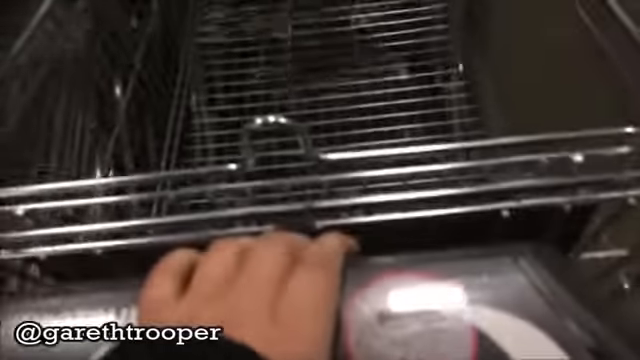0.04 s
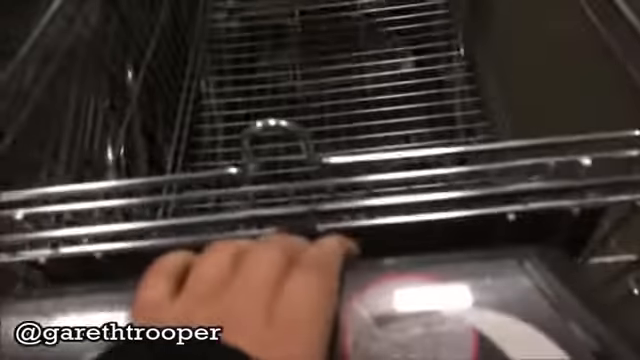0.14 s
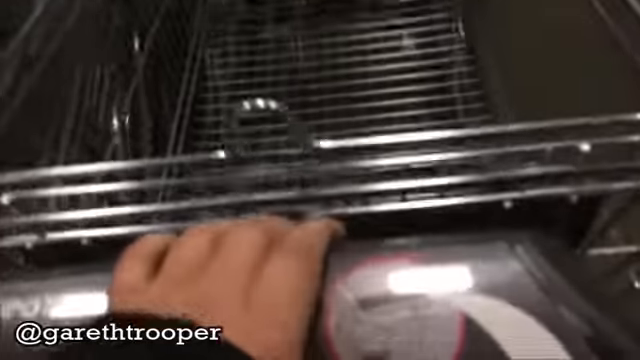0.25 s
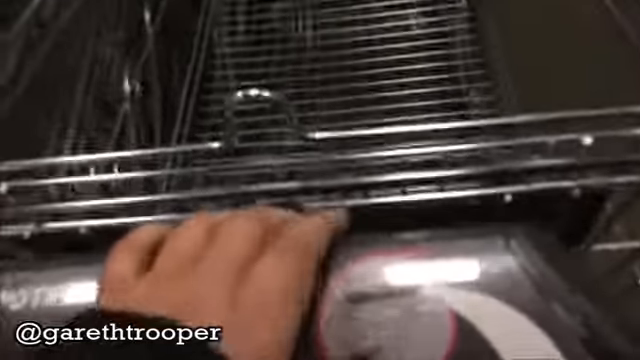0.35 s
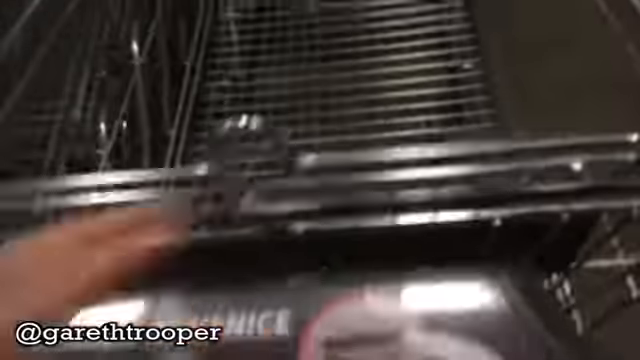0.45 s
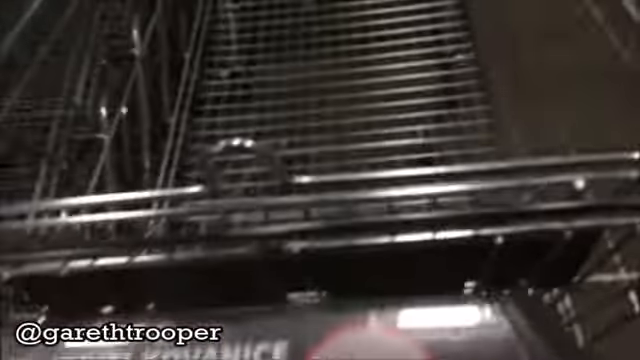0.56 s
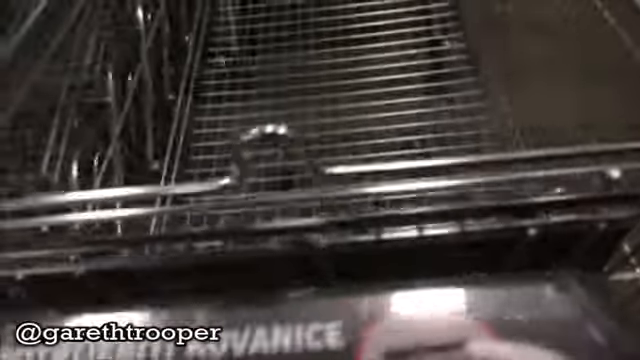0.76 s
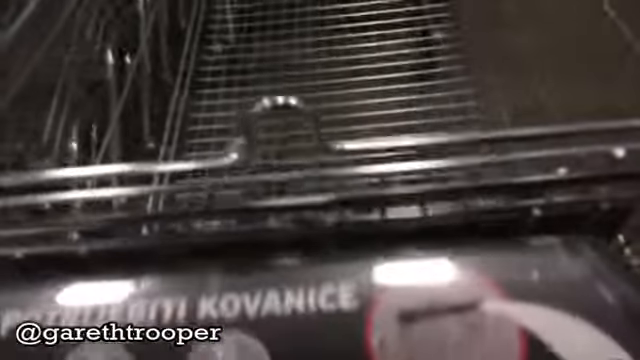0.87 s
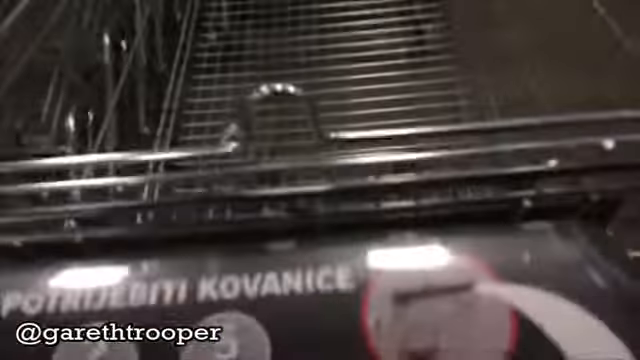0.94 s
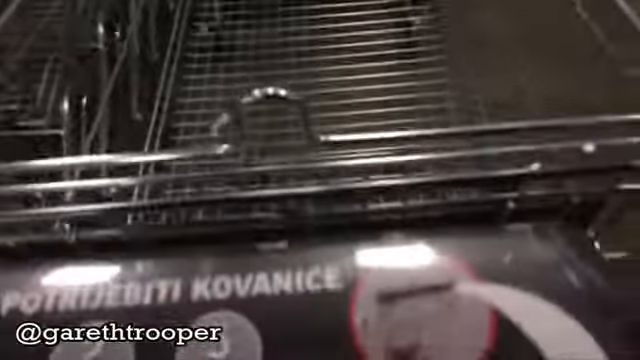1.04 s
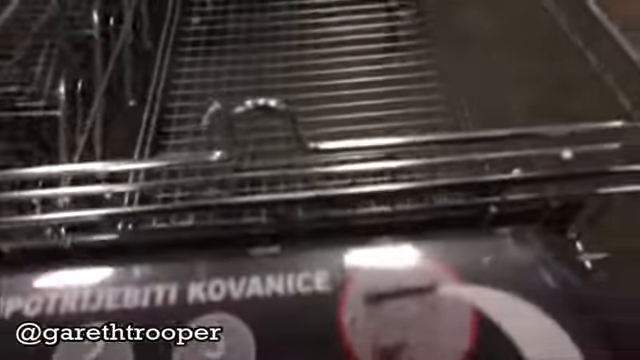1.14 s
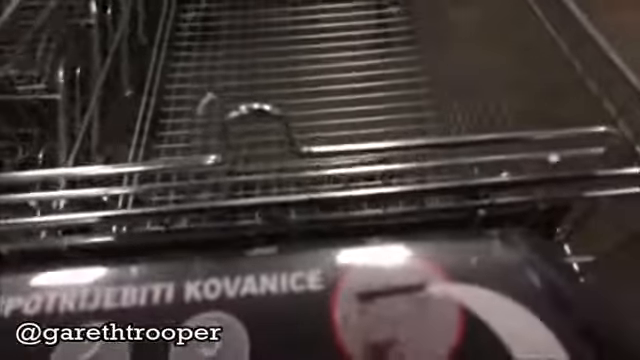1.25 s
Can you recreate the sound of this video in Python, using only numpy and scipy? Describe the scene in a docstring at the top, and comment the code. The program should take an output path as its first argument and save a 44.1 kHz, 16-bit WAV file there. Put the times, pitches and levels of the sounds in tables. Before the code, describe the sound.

Heard up close in a hard-walled hall, a shopping trolley rolls briefly and hits parked ones with a loud steel crash. It rattles inward, bumps and stops with a knock, then trolleys further down clack softly.

```python
"""A wire shopping trolley rolls into a row of parked ones in a hard-walled hall.
It approaches with a faint drone over a low rumble. From 0.24 s, a quick run of steel-on-steel blows
thuds in the frame and rings the basket. Wires chatter and scrape as it slides in; the frame bumps
twice and stops with a hollow knock near 0.71 s. Trolleys down the row clack as the hall rings out."""
import sys
import numpy as np
from scipy import signal
from scipy.fft import rfft, irfft
from scipy.io import wavfile

SR = 44100
rng = np.random.default_rng(int(sys.argv[2]) if len(sys.argv) > 2 else 0)


def bounce(signal):
    """Save signal as a 16-bit WAV file at the path given by the first command-line argument."""
    frames = np.transpose(np.atleast_2d(signal))
    limited = np.clip(frames, -1, 1)
    pcm = np.round(limited * 32767).astype(np.int16)
    wavfile.write(sys.argv[1], SR, pcm)


N = 57330
T = np.arange(N) / SR
HZ = np.maximum(np.arange(N // 2 + 1) * SR / N, 1)


def from_db(db):
    """Decibels to gain."""
    return 10 ** (np.asarray(db) / 20)


def rms_one(x):
    """Scale to unit power."""
    return x / np.sqrt(np.mean(x ** 2) + 1e-20)


def at_hz(points, hz):
    """Interpolate a table over log frequency."""
    f_hz, value = np.transpose(points)
    return np.interp(np.log(hz), np.log(f_hz), value)


def envelope(points):
    """(t/s, level/dB) curve to gain per sample."""
    return from_db(np.interp(T, *np.transpose(points)))


def decay(t60_s):
    """Exponential decay, 60 dB in t60_s."""
    return np.exp(-np.log(1000) * T / max(t60_s, 1e-3))


def delay(x, t_s):
    """Start x at t_s."""
    return np.interp(T - t_s, T, x, left=0)


def through(x, response):
    """Play x through a ringing body or room."""
    return signal.fftconvolve(x, response)[:N]


def noise(spectrum):
    """Random-phase noise shaped by (f/Hz, level/dB); rms 1."""
    phases = np.exp(2j * np.pi * rng.random(len(HZ)))
    return rms_one(irfft(from_db(at_hz(spectrum, HZ)) * phases, N))


def dense_ring(spectrum, t60_table):
    """Densely packed modes, each octave decaying at its own rate."""
    bins = rfft(noise(spectrum))
    octave = np.round(np.log2(np.maximum(HZ, 125)))
    return sum(irfft(bins * (octave == k), N) * decay(at_hz(t60_table, 2 ** k))
               for k in np.unique(octave))


def modes(table, spread_db=2):
    """One strike of discrete modes, random in strength and phase."""
    return sum(from_db(db + spread_db * rng.normal()) * decay(t60_s)
               * np.sin(2 * np.pi * (hz * T + rng.random())) for hz, db, t60_s in table)


def background(drone_hz=116.5, drone_db=-39.5, drone_end_s=0.22, fade_s=0.12, air_db=-48):
    """Low rumble, drone of rolling and steady hall air."""
    # rumble envelope: t/s, level/dB
    rumble_level = [(0, -46), (.21, -43), (.27, -33), (.34, -65), (.6, -63), (.72, -50.5), (.745, -38.5),
                    (.82, -44), (.97, -45), (1.1, -42), (1.3, -44.5)]
    # rumble and air spectra: f/Hz, level/dB
    rumble_spectrum = [(20, -19), (40, -9), (62, 5), (88, -11), (120, -2), (170, -4), (300, -22.5),
                       (600, -55)]
    air_spectrum = [(60, -32), (120, -10.5), (180, 3), (320, -2.5), (550, -15), (1100, -16), (2200, -20),
                    (4500, -32), (9000, -40), (15000, -73)]
    rumble = envelope(rumble_level) * noise(rumble_spectrum)
    fade = np.clip((drone_end_s - T) / fade_s, 0, 1)
    drone = np.sqrt(2) * np.sin(2 * np.pi * drone_hz * T) * fade
    return rumble + from_db(drone_db) * drone + from_db(air_db) * noise(air_spectrum)


def hall(x, wet_db=-12.5, build_s=0.039):
    """Diffuse tail off hard walls; builds up, dies soonest in the treble."""
    # tail spectrum: f/Hz, level/dB
    spectrum = [(100, -12), (250, -0.5), (1200, -0.5), (3000, 0), (7000, 1), (15000, 1.5)]
    # reverberation time: f/Hz, t60/s
    hall_t60 = [(200, 1.09), (1200, 1.7), (3000, 1.12), (7000, 0.82), (14000, 0.61)]
    tail = dense_ring(spectrum, hall_t60) * (1 - np.exp(-T / build_s))
    return from_db(wet_db) * through(x, rms_one(tail) / np.sqrt(N))


def clacks(t60_s=0.23):
    """Trolleys further down the row settle."""
    # distant clacks: t/s, level/dB
    hits = [(.835, -46), (.885, -44), (1.133, -46), (1.144, -44.5)]
    # clack spectrum: f/Hz, level/dB
    spectrum = [(400, 4.5), (1100, -3.5), (2200, 2), (3500, -4), (5000, -18), (9000, -33)]
    return sum(delay(from_db(db) * noise(spectrum) * decay(t60_s), t_s) for t_s, db in hits)


def knocks(bump_t60_s=0.092, modes_db=-4):
    """The frame bumps on the way in and at the stop, sounding its hollow note."""
    # dull knocks: t/s, level/dB
    hits = [(.501, -34.5), (.608, -35), (.7085, -27), (.7118, -30.5), (.7275, -32)]
    # bump spectrum: f/Hz, level/dB
    spectrum = [(150, -11), (500, -2.5), (900, -0.5), (1500, -1.5), (2300, -8), (5000, -12), (12000, -38)]
    # frame modes: f/Hz, level/dB, t60/s
    frame_modes = [(848, -8.5, 0.091), (888.4, -1.5, 0.12), (946, -4, .12), (1242, -3, 0.15),
                   (1546, -8.5, 0.15), (2769, -13.5, .22)]
    out = 0
    for t_s, db in hits:
        bump = noise(spectrum) * decay(bump_t60_s)
        note = from_db(modes_db) * modes(frame_modes)
        out += delay(from_db(db) * (bump + note), t_s)
    return out


def chatter(places=6, contacts_per_s=700, spread_db=2.5, mesh_t60_s=0.058, wire_db=-11):
    """Wires slip over wires at several places; tiny uneven contacts ring the mesh and thin wires."""
    # rubbing strength: t/s, level/dB
    slide_level = [(0, -50.5), (.04, -57), (.075, -53.5), (.1, -44.5), (.135, -58), (.23, -61), (.28, -28),
                   (.33, -28), (.4, -33.5), (.465, -39.5), (.5, -29), (.53, -33), (.6, -31.5), (.66, -33),
                   (.695, -34), (.725, -36), (.765, -43), (.9, -81)]
    # scraped mesh spectrum: f/Hz, level/dB
    mesh_spectrum = [(150, -25), (400, -2), (800, -2.5), (1400, 2), (2800, -3), (5200, -3.5), (6300, 0.5),
                     (7500, -1.5), (10000, -1), (15000, -8.5)]
    # thin-wire modes: f/Hz, level/dB, t60/s
    wire_modes = [(5900, -11, 0.17), (6070, 1, 0.23), (6090, 3.5, 0.23), (6370, -9, 0.15),
                  (6486, -0.5, .25), (6700, -3.5, 0.18), (6810, -12, 0.13), (9360, -10.5, .2),
                  (10375, -7, 0.19)]
    out = 0
    for _ in range(places):
        sizes = from_db(spread_db * np.minimum(rng.exponential(1, N), 3))
        signs = rng.choice([-1, 1], N)
        touching = rng.random(N) < contacts_per_s / places / SR
        contacts = rms_one(sizes * signs * touching) * envelope(slide_level)
        mesh = rms_one(noise(mesh_spectrum) * decay(mesh_t60_s))
        wires = from_db(wire_db) * rms_one(modes(wire_modes))
        out += through(contacts, (mesh + wires) / np.sqrt(N * places))
    return out


def crash(modes_db=-10, crack_db=4.5, crack_t60_s=0.0096, thud_t60_s=0.047):
    """Steel hits steel: each blow cracks, thuds in the frame and leaves the basket ringing."""
    # blows: t/s, ring level/dB, thud level/dB
    blows = [(0.2427, -19, -28), (0.2457, -20.5, -14.5), (0.2502, -17.5, -19), (.257, -19, -16),
             (0.2626, -21.5, -19), (.277, -19.5, -35), (.286, -23.5, -55), (.304, -29.5, -47)]
    # basket and frame-thud spectra: f/Hz, level/dB
    basket_spectrum = [(300, -23.5), (600, -7.5), (1100, -2.5), (1600, 1), (2600, -3.5), (4500, -3),
                       (5600, -4), (8500, -3), (12000, -3.5), (15000, -7.5)]
    thud_spectrum = [(30, 0.5), (60, 4), (120, -3.5), (220, -7.5), (550, -2.5), (1000, -11), (1600, -6),
                     (3000, -27), (8000, -39.5)]
    # basket ring time: f/Hz, t60/s
    basket_t60 = [(300, 0.16), (1500, 0.39), (5000, .38), (14000, 0.4)]
    # strongest basket modes: f/Hz, level/dB, t60/s
    basket_modes = [(931, -10, 0.34), (1382, -12.5, 0.21), (1468, -6.5, .22), (1625, -2.5, 0.15),
                    (1669, 0, 0.18), (2039, -4, 0.49), (3010, -23, .3), (3055, -6.5, 0.3),
                    (3320, -14, 0.19), (3900, -20, .4), (5875, -7.5, 0.5), (6535, -6, 1), (8440, 1, 0.22),
                    (10300, -5, .25)]
    out = 0
    for t_s, ring_db, thud_db in blows:
        ring = dense_ring(basket_spectrum, basket_t60) + from_db(modes_db) * modes(basket_modes)
        crack = from_db(crack_db) * noise(basket_spectrum) * decay(crack_t60_s)
        thud = from_db(thud_db) * noise(thud_spectrum) * decay(thud_t60_s)
        out += delay(from_db(ring_db) * (ring + crack) + thud, t_s)
    return out


def scene(side_db=-17):
    """Near-central mix; close reflections add slight width."""
    reflection_spectrum = [(50, -18), (300, -3.5), (8000, 2)]  # f/Hz, level/dB
    trolleys = crash() + chatter() + knocks() + clacks()
    mid = trolleys + hall(trolleys) + background()
    reflections = rms_one(noise(reflection_spectrum) * decay(t60_s=0.05)) / np.sqrt(N)
    side = from_db(side_db) * through(mid, reflections)
    return np.array([mid + side, mid - side])


def record(dry, ceiling=0.86, cutoff_hz=15300):
    """Soft clip, then steep low-pass."""
    lowpass = signal.ellip(12, 0.1, 90, cutoff_hz, fs=SR, output="sos")
    return signal.sosfilt(lowpass, ceiling * np.tanh(dry / ceiling))


dry = scene()
out = record(dry)
bounce(out)
```